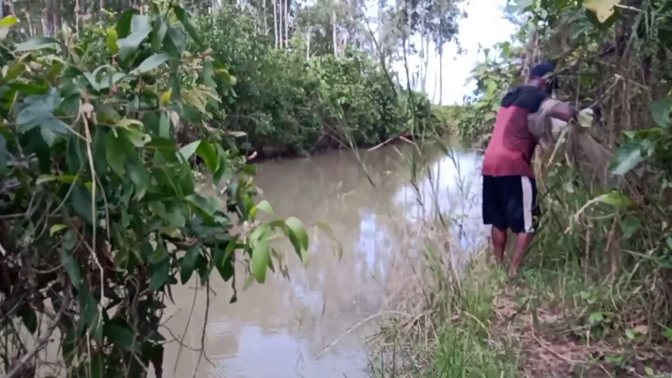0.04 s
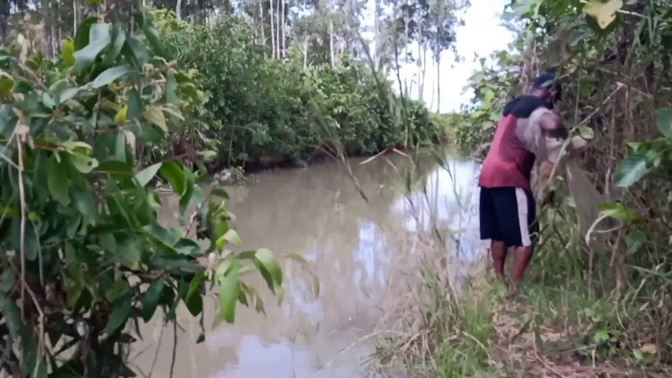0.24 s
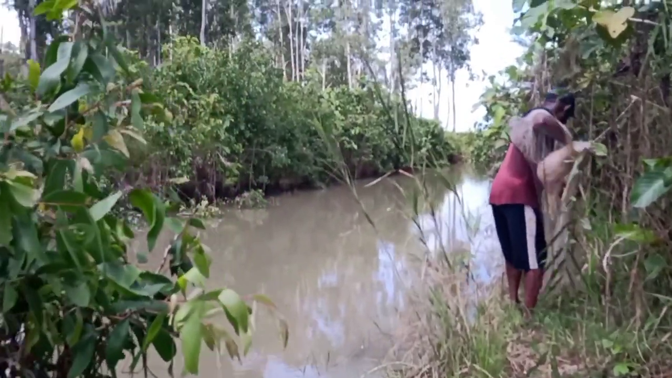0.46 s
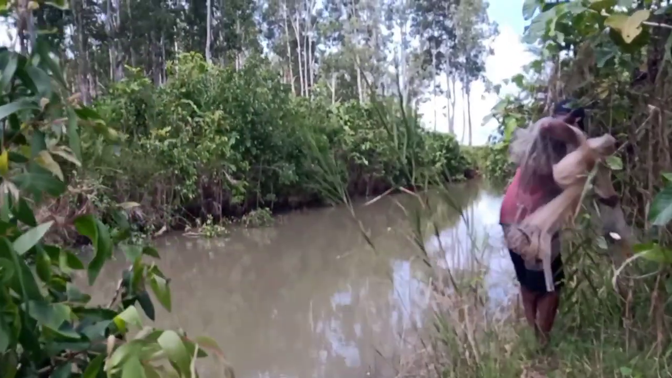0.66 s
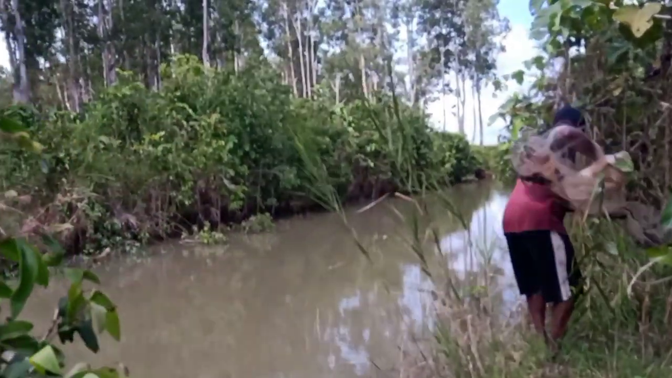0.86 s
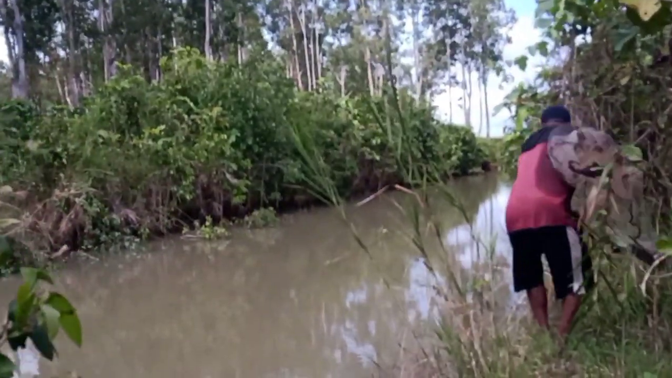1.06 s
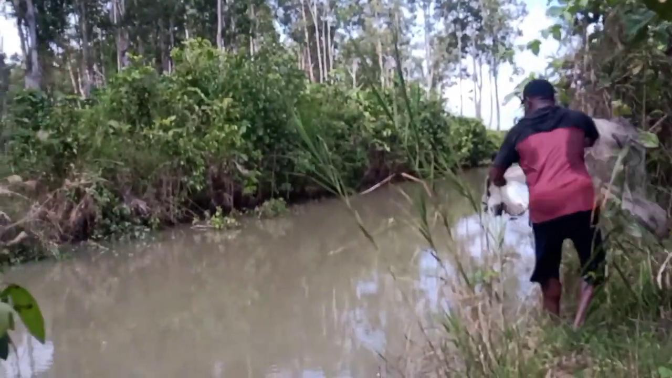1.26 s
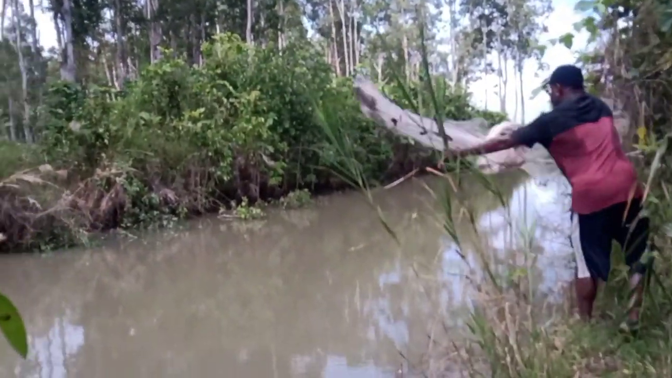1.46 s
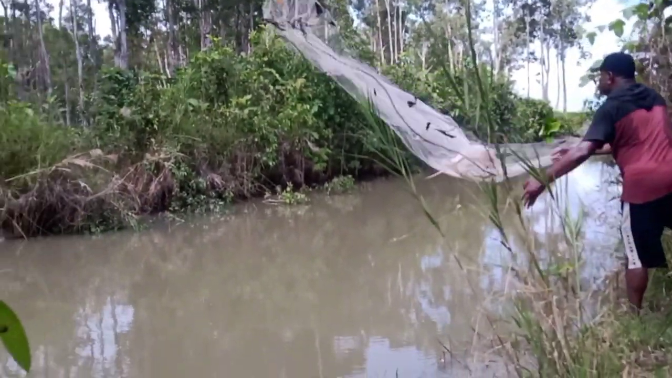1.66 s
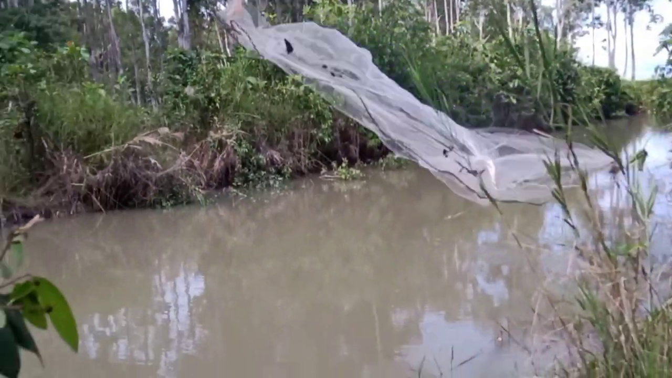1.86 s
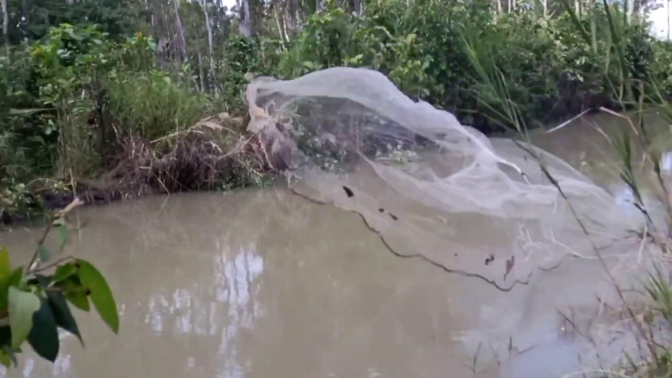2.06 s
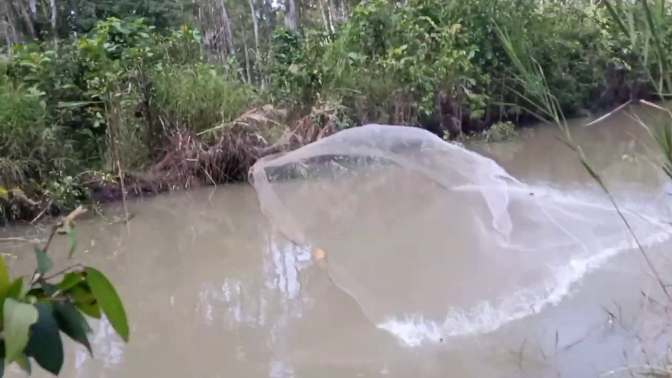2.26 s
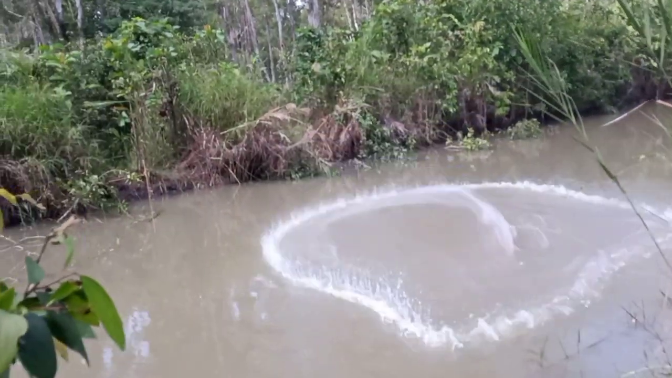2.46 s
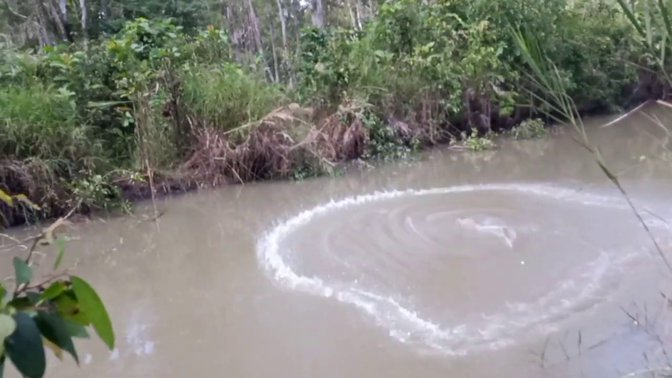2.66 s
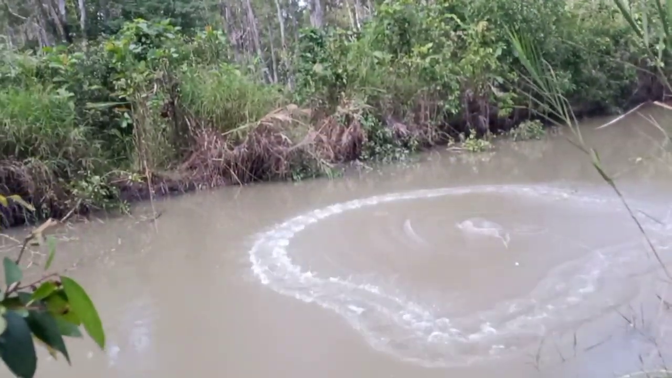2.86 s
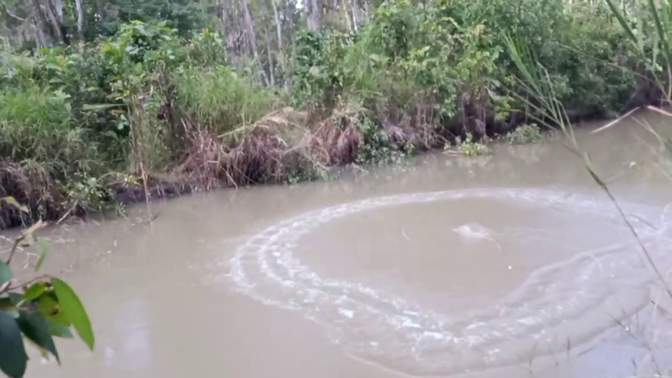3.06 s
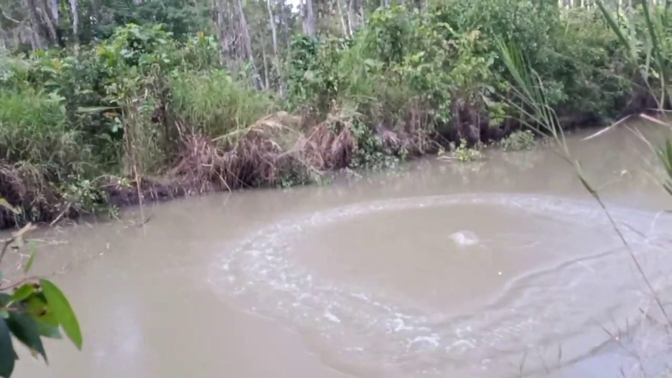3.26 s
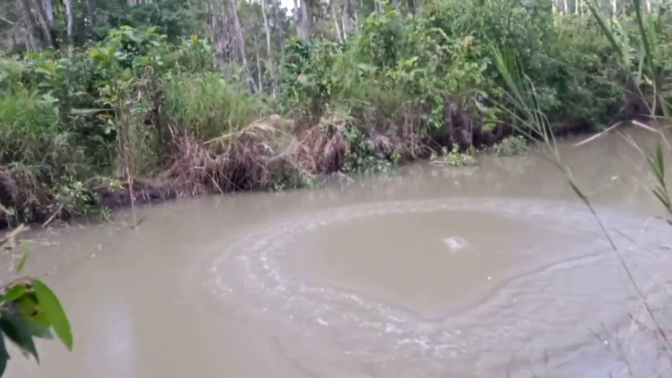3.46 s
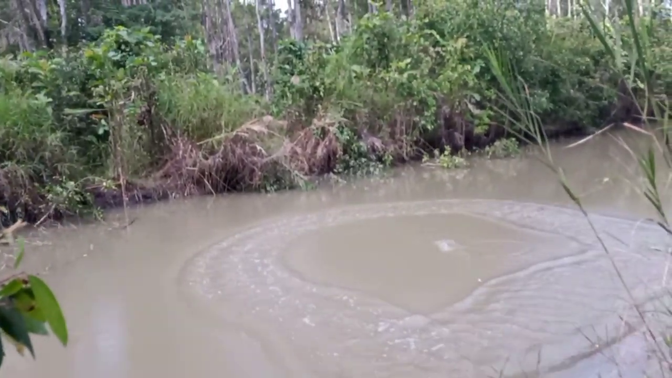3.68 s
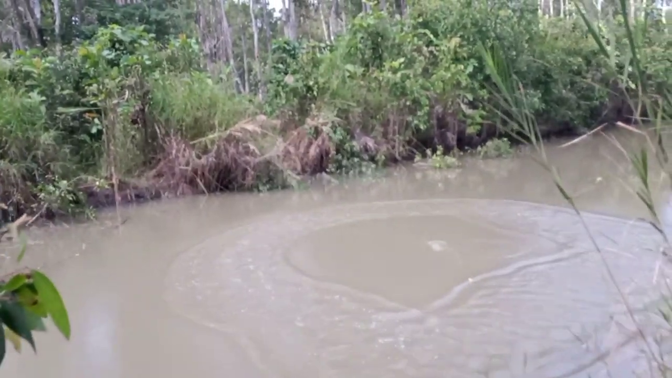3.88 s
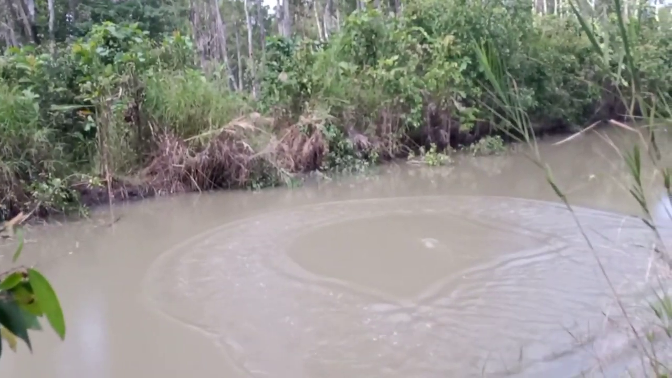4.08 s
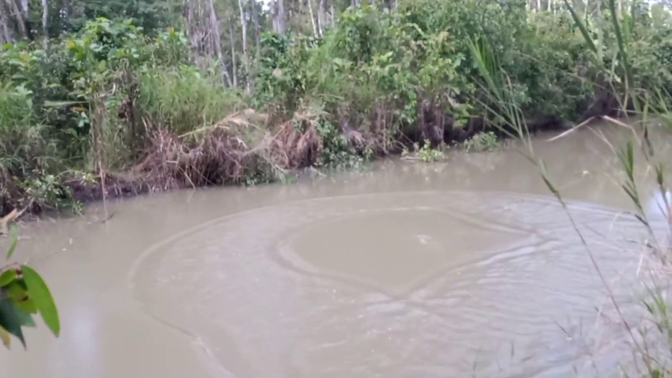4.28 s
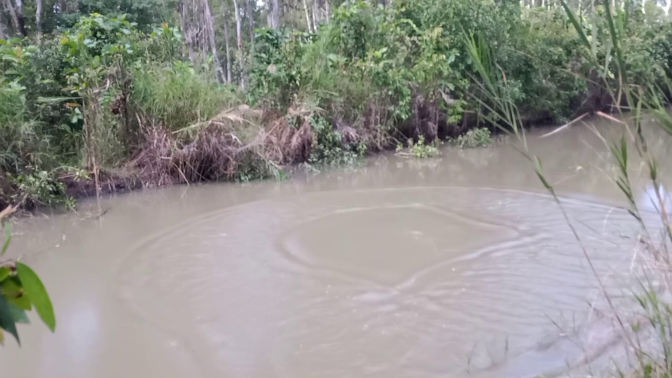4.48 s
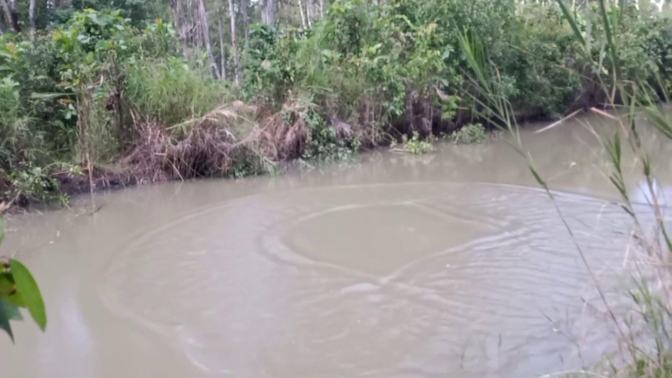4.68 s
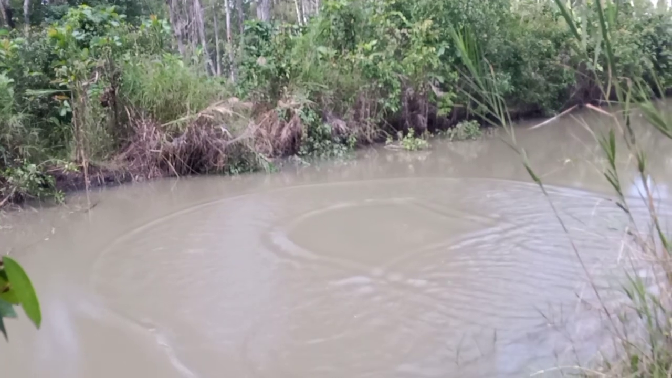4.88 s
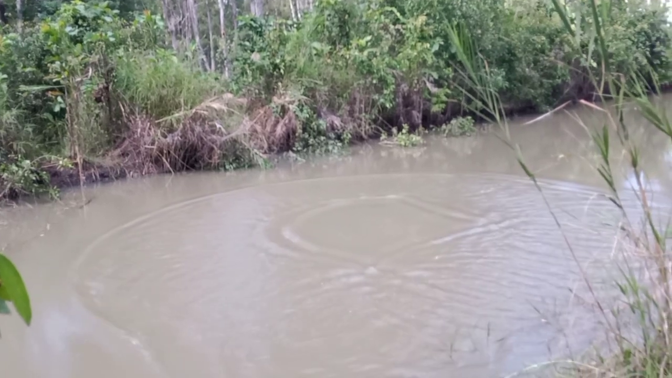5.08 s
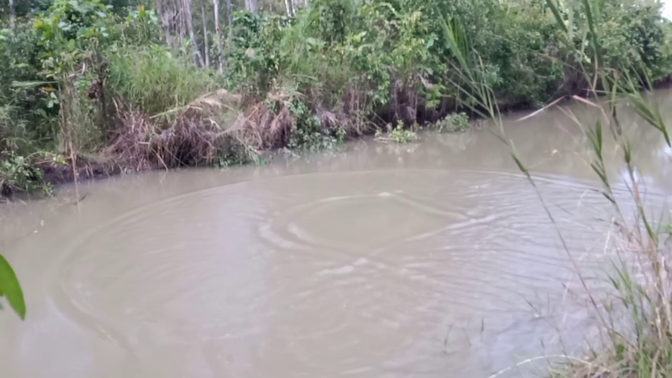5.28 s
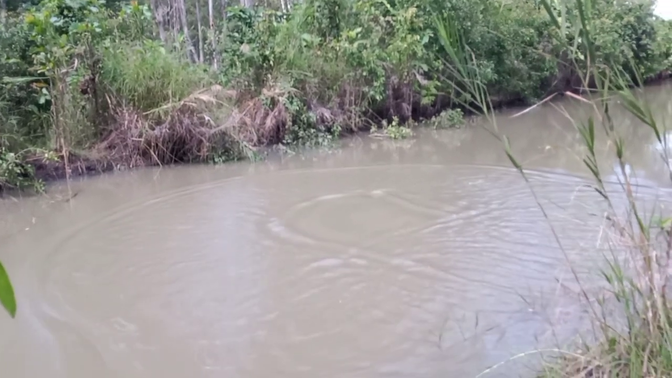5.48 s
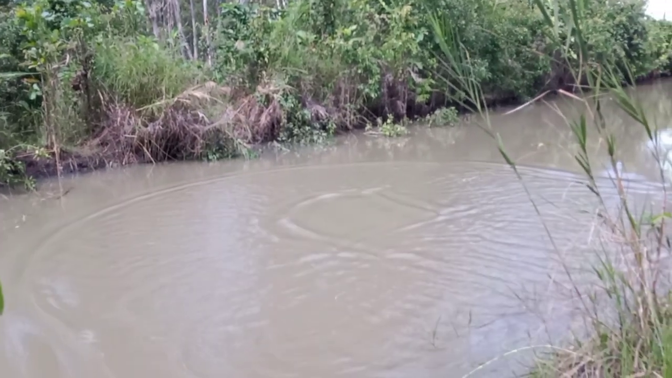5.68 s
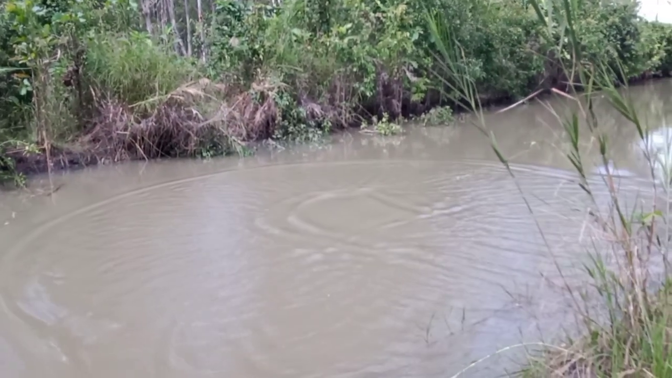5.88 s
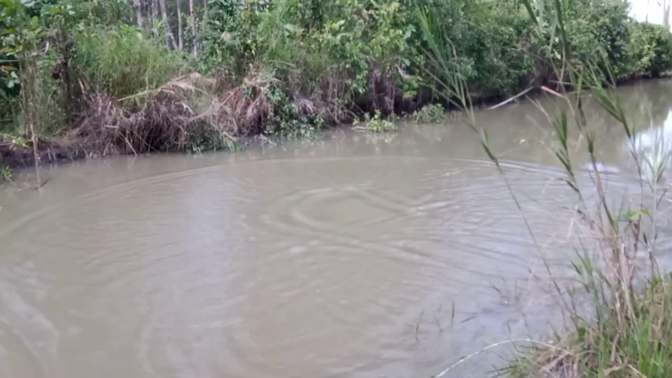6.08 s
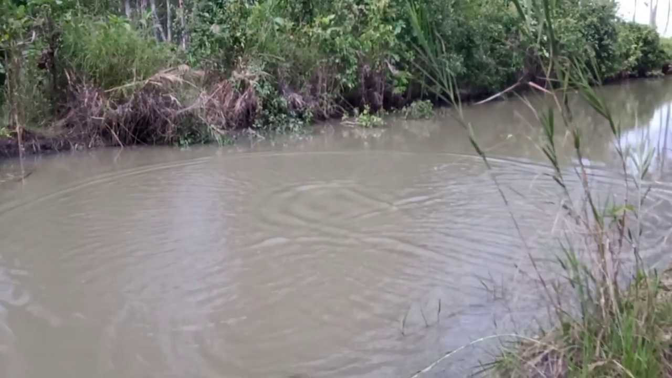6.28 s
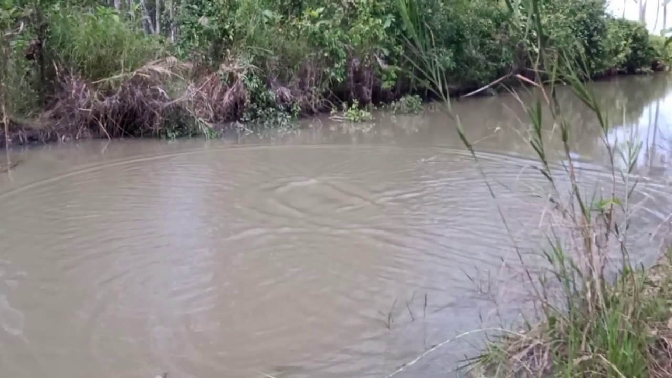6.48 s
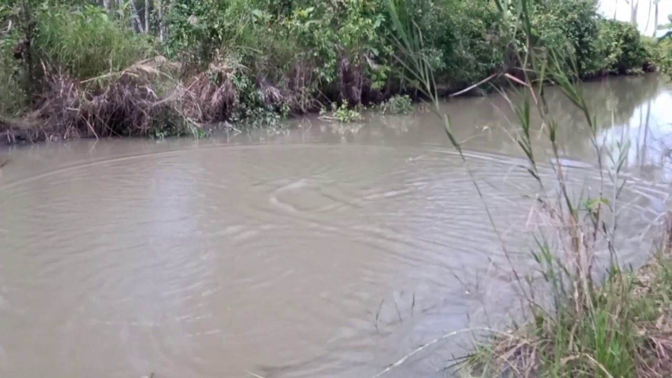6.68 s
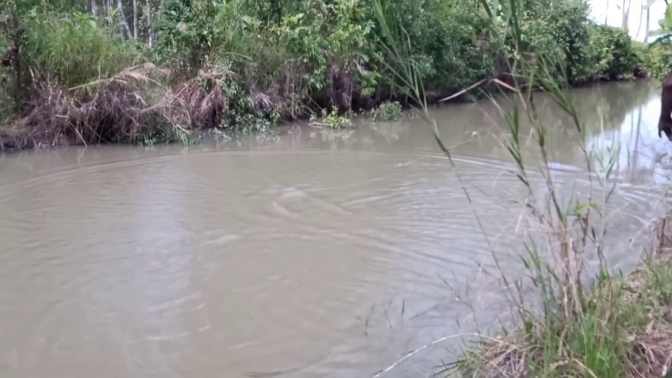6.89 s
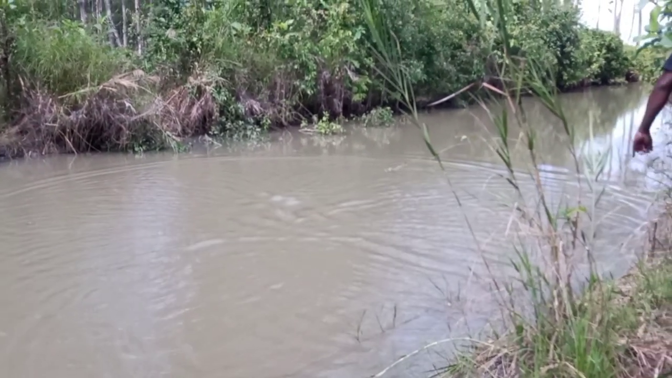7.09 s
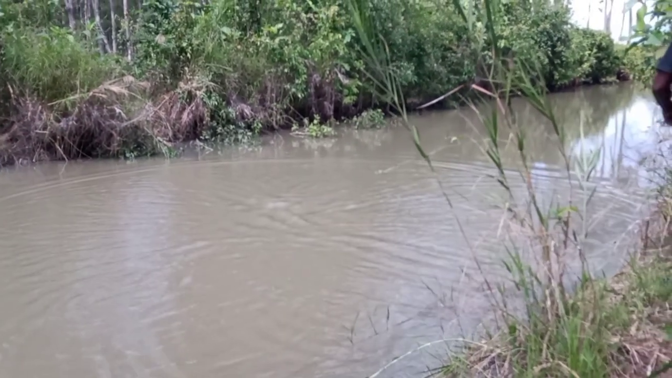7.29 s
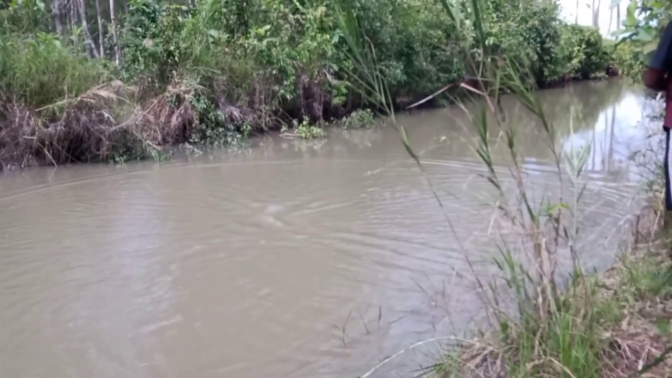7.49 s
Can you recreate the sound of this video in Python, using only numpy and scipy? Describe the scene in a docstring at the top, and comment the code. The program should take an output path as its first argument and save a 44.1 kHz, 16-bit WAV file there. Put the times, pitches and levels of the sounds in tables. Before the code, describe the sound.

On a quiet river bank, a thrown net whooshes and lands in a fizzing splash, after crackling grass, with steady high insect trills continuing throughout.

```python
"""On a grassy river bank a fisherman gathers a cast net, steps forward and throws it.
Grass and mesh rustle as crackling noise, stalks snap, and weights on the rim patter in amid ringing bubbles.
A near bush cricket trills in short falling tones over a steady band of insect noise; a fainter cricket chirps.
Birds whistle in gliding tones, an engine throbs far away in low puffs, and wind and hiss are soft noise.
The bank is open, with little echo; both channels are alike."""
import sys
import numpy as np
from scipy import signal
from scipy.fft import rfft, irfft, next_fast_len
from scipy.io import wavfile
from scipy.ndimage import map_coordinates

SR = 44100
rng = np.random.default_rng(int(sys.argv[2]) if len(sys.argv) > 2 else 0)


def store_pcm(level_fs):
    """Save levels as 16-bit WAV."""
    pcm = np.round(np.clip(level_fs, -1, 1) * 32767).astype(np.int16)
    wavfile.write(sys.argv[1], SR, np.atleast_2d(pcm).T)


N = 332514

# trills of the near bush cricket: (first stroke [s], last stroke [s], level before small lifts [dB])
TRILLS = [(0.233, 0.568, -46), (1.081, 1.41, -41), (2.385, 2.713, -42), (3.001, 3.272, -39),
          (3.583, 3.893, -39.5), (4.202, 4.494, -39.5), (4.801, 5.094, -39.5), (5.4, 5.71, -40),
          (6.06, 6.393, -38.5), (6.844, 7.117, -39)]
# tone colour of crisp blades and fine spray: (frequency [Hz], level [dB])
CRISP = [(2500, 6.5), (4500, -7.5), (7000, 1), (10000, 2), (11400, 1), (12400, 0), (13700, -0.5),
         (14600, 6), (15800, -9)]
LANDING = 2.169  # the first weights touch the water (s)


def amp(db):
    """Decibels to gain."""
    return 10 ** (np.asarray(db) / 20)


def unit(x):
    """Scale to rms 1."""
    return x / np.sqrt(np.mean(x ** 2) + 1e-20)


def clock():
    """The time of every sample, in seconds."""
    return np.arange(N) / SR


def wobble(rate):
    """A smooth random curve through rate random points a second."""
    knots = rng.standard_normal(int(N * rate / SR) + 4)
    return map_coordinates(knots, [clock() * rate])


def colour(x, points):
    """Shape x by (Hz, dB) points joined on a log frequency axis."""
    size = next_fast_len(len(x) + 8192)
    f, db = np.transpose(points)
    hz = np.fft.rfftfreq(size, 1 / SR)
    curve_db = np.interp(np.log(hz + 1), np.log(np.sort(f)), db, left=-120, right=-120)
    return irfft(rfft(x, size) * amp(curve_db), size)[:len(x)]


def noise(points):
    """Coloured noise of rms 1."""
    return unit(colour(rng.standard_normal(N), points))


def add(track, s, sound):
    """Mix a sound into the track at time s."""
    start = max(round(s * SR), 0)
    part = track[start:start + len(sound)]
    part += sound[:len(part)]


def swell(start, length, attack_s, release_s):
    """A gain that rises, holds until its length is over, then dies away."""
    t = clock() - start
    rise = np.clip(t / attack_s, 0, 1)
    return rise * np.exp(-np.clip((t - length) / release_s, 0, 30))


def bump(s, half_width):
    """A brief bell-shaped rise to 1 around time s."""
    return np.exp(-np.minimum(((clock() - s) / half_width) ** 2, 30))


def crackle(points, rate, spread_db, smooth):
    """Tiny random impacts of uneven size, rate a second, over a smooth wash, rms 1."""
    count = int(rate * N / SR)
    sizes = amp(spread_db * np.minimum(rng.exponential(size=count), 3.2))
    sizes = sizes * rng.choice([-1, 1], count)
    ticks = np.bincount(rng.integers(N, size=count), sizes, N)
    return unit(unit(colour(ticks, points)) + smooth * noise(points))


def rustle():
    """Blades and mesh rub with a dull scrape and a crisp hiss; the flying net swishes."""
    # netting or legs dragged through grass, levels before clumping and the crisp lift:
    # (start [s], length [s], rubbing level [dB], crisp hiss level [dB])
    moves = [(-.02, 1.47, -64, -70.5), (-.02, 0.24, -63.5, -80), (0.32, 0.47, -59, -64.5),
             (0.386, .13, -51, -57), (0.69, 0.081, -63, -62), (1.017, .05, -57, -67),
             (1.168, 0.53, -59, -59.5), (1.232, .21, -56, -55), (1.628, 0.033, -49.5, -57),
             (1.727, .28, -54.5, -54), (1.78, 0.054, -46.5, -63), (1.927, 0.062, -50, -50),
             (2.055, 0.19, -57, -67), (2.996, 1.15, -73, -73), (3.438, 0.31, -64, -74),
             (3.726, 0.31, -77, -78), (4.763, 0.11, -71, -83), (5.123, 0.29, -72, -94),
             (6.17, 0.42, -68, -83), (6.87, .15, -70.5, -79), (7.395, 0.085, -65.5, -82)]
    # folds of the net whipping open, before a 0.5 dB cut: (time [s], half width [s], level [dB])
    swishes = [(1.826, 0.036, -42.5), (1.92, 0.025, -40.5)]
    # tone colour of rubbing grass: (frequency [Hz], level [dB])
    rub_colour = [(59, -32), (100, -14), (142, -6), (261, -6.5), (426, -1), (508, -2.5), (594, -0.5),
                  (903, 1), (1220, -3.5), (1690, -0.5), (2240, -0.5), (4430, -14), (6500, -23.5),
                  (8450, -45), (14300, -120)]
    # tone colour of mesh flying open: (frequency [Hz], level [dB])
    swish_colour = [(600, -8.5), (1200, -7), (1600, -4), (1900, 0.5), (2400, -3), (3100, -9), (4200, -15.5),
                    (6500, -26), (10000, -53)]
    attack_s, release_s = 0.018, 0.038  # the blades bend, then spring back
    power = 0
    for s, length, rub_db, hiss_db in moves:
        power = power + np.outer(amp([rub_db, hiss_db]), swell(s, length, attack_s, release_s)) ** 2
    rub, crisp = np.sqrt(power)
    flight = sum(amp(db) * bump(s, half_width) for s, half_width, db in swishes)
    clumps = unit(amp(2.4 * wobble(70)))
    blades = crackle(CRISP, rate=2000, spread_db=4, smooth=.9)
    scrape = rub * crackle(rub_colour, rate=800, spread_db=4.0, smooth=0.87)
    swish = amp(-0.5) * flight * crackle(swish_colour, rate=1300, spread_db=0.5, smooth=0.73)
    return swish + clumps * (scrape + amp(2.5) * crisp * blades)


def bank(x, t60=0.36):
    """The bushes on the far bank scatter back a short tail that falls 60 dB in t60 seconds."""
    t = np.arange(SR // 2) / SR
    tail = rng.standard_normal(len(t)) * amp(-60 * t / t60) * (t > .008)
    return signal.fftconvolve(x, tail / np.linalg.norm(tail))[:N]


def chorus(scatter_db=-13.0, build_s=0.16, fade_s=0.065):
    """Many distant insects blur into one fluttering band; leaves scatter the near trills into it."""
    # tone colour of the massed insects: (frequency [Hz], level [dB])
    band = [(6000, -58), (6800, -37), (7300, -16.5), (7750, -6), (8100, 3.5), (8450, -1), (8900, -11),
            (9200, -25), (9900, -60), (12000, -39)]
    # bush crickets farther off joining in: (start [s], length [s], level [dB])
    far_trills = [(.04, 0.48, -49), (.82, 1.17, -51), (2.1, 0.39, -46.5), (3.75, 0.29, -51),
                  (4.45, 0.47, -53.5), (6.25, .28, -53)]
    start_db, recede_db_per_s = -48.5, 0.3
    bed = amp(start_db - recede_db_per_s * clock())
    scattered = [(first, last - first, db + scatter_db) for first, last, db in TRILLS]
    power = bed ** 2
    for s, length, db in list(far_trills) + scattered:
        power = power + (amp(db) * swell(s, length, build_s, fade_s)) ** 2
    flutter_hz = 52 + 6 * wobble(5.6)  # close to the wing stroke rate
    flutter = np.sin(2 * np.pi * np.cumsum(flutter_hz) / SR)
    return np.sqrt(power) * unit(noise(band) * amp(0.68 * flutter))


def small_cricket(pitch_hz=9430, chirp_rate=9, level_db=-71.5, early_db=-6):
    """Faint high chirps of narrow noise with short rests, growing clearer from 3 to 3.7 s."""
    turn = 2 * np.pi * np.cumsum(chirp_rate + 0.426 * wobble(2.7)) / SR
    gate = np.clip(.9 + np.sin(turn), 0, 1)
    gate = gate * (1 + .3 * np.sin(5 * turn))  # quicker pulses within the chirp
    clearer_db = np.interp(clock(), [3, 3.7], [early_db, 0])
    tone = noise([(pitch_hz - 450, -30), (pitch_hz, 0), (pitch_hz + 450, -30)])
    return amp(level_db + clearer_db) * unit(gate * tone)


def air():
    """Light wind in far trees as gently swaying noise, and a thin even hiss."""
    # tone colour of the wind: (frequency [Hz], level [dB])
    wind_colour = [(15, -37), (25, -29), (81, 1), (152, -3.5), (440, -1.5), (494, -3), (882, -6),
                   (1400, -10.5), (1940, -9), (2680, -9.5), (3220, -13.5), (4450, -23.5), (6300, -27.5),
                   (8190, -47), (13900, -120)]
    # tone colour of the hiss: (frequency [Hz], level [dB])
    hiss_colour = [(4000, -35), (6000, -15), (10500, 1), (12500, -5), (13700, 1), (14700, -2), (15600, 10)]
    sway = amp(.6 * wobble(2))
    return amp(-66.0) * noise(wind_colour) * sway + amp(-79) * noise(hiss_colour)


def far_engine(beat_rate=7.2, pipe_hz=86, level_db=-66):
    """A slow single cylinder, so far off that only soft low puffs arrive, slightly uneven."""
    out, t = np.zeros(N), np.arange(-SR // 20, SR // 20) / SR
    for s in np.arange(.105, N / SR, 1 / beat_rate):
        puff = np.exp(-(t / 0.012) ** 2) * np.cos(2 * np.pi * pipe_hz * t)
        add(out, s + t[0] + rng.normal(0, 0.0061), amp(level_db + rng.normal(0, 2)) * puff)
    return out


def snap(points, t60):
    """A coloured crack of peak 1 that begins 5 ms in, from noise falling 60 dB in t60 seconds."""
    t = np.arange(SR // 20) / SR
    burst = rng.standard_normal(len(t)) * amp(-60 * t / t60)
    burst = colour(np.pad(burst, (SR // 200, 0)), points)
    return burst / np.abs(burst).max()


def steps(crack_t60=0.035, click_t60=0.0044, brighten=0.6):
    """Stalks crack, lead weights click, and the soft ground thuds under a foot."""
    # stalks cracking underfoot: (time [s], peak level [dB], top against body [dB])
    cracks = [(.226, -46.5, 1), (0.356, -35.5, -11.5), (0.458, -35.5, -13), (0.494, -40, -6),
              (0.52, -36.5, -6.5), (.602, -42, -7), (1.019, -37.5, -10.5), (1.036, -32.5, -12),
              (1.046, -45, -6), (1.06, -34.5, -16.5), (1.086, -42, -18), (1.222, -42, -13),
              (1.378, -36, -10), (1.587, -40, -10.5), (1.67, -43, -3), (1.734, -41.5, -12),
              (4.859, -49, -9), (5.812, -46.5, -6.5), (7.003, -43, -6.5), (7.308, -51.5, -21),
              (7.463, -38, -16), (7.476, -42, -18), (7.509, -41.5, -10)]
    # tone colour of a stalk before its tilt: (frequency [Hz], level [dB])
    stalk = [(59, -38), (100, -15), (449, 3.5), (828, 1.5), (1260, -2), (2760, -2.5), (4430, -40),
             (4920, -27), (6500, -27), (8450, -58), (14300, -120)]
    # lead weights clicking together: (time [s], peak level [dB])
    clicks = [(.709, -40), (1.284, -31), (1.409, -30), (1.467, -35), (1.4704, -20.5), (1.4943, -30.5),
              (6.453, -52)]
    # soft footfalls: (time [s], peak level [dB], frequency [Hz])
    thuds = [(1.335, -49, 77.5), (2.02, -57, 58)]
    lead_colour = [(600, -24), (3000, -14), (6000, -12.5), (8500, -4), (11500, -17), (15500, -10)]  # (Hz, dB)
    out, lead_in_s = np.zeros(N), 1 / 200  # the silent start of a snap
    for s, db, top_db in cracks:
        tilt = brighten * (top_db + 9.5)  # dB per octave: dry stalks snap brighter
        tilted = [(hz, level + tilt * np.log2(hz / 1000)) for hz, level in stalk]
        add(out, s - lead_in_s, amp(db) * snap(tilted, crack_t60))
    for s, db in clicks:
        add(out, s - lead_in_s, amp(db) * snap(lead_colour, click_t60))
    t = np.arange(-SR // 40, SR // 40) / SR
    for s, db, hz in thuds:
        add(out, s + t[0], amp(db) * np.hanning(len(t)) * np.sin(2 * np.pi * hz * t))
    return out


def bush_cricket(stroke_rate=48, pitch_hz=8160, start_drop_hz=420, end_drop_hz=1100, width_s=0.0033, flick_db=-13):
    """Each wing stroke is a short tone that sags as the wing slows; a trill warms up in pitch and strength."""
    swell_db = 1  # a trill gains this much from first stroke to last, besides warming up
    out = np.zeros(N)
    t = np.arange(-SR // 100, SR // 80) / SR
    sag = np.clip((t - .0015) / 0.0067, 0, None) ** 1.42
    for first, last, db in TRILLS:
        strokes = np.linspace(first, last, round((last - first) * stroke_rate) + 1)
        for k, s in enumerate(strokes):
            cold = max(1 - k / 5.36, 0)  # gone after the first few strokes
            sharp, strong, late = rng.standard_normal(3)
            hz = pitch_hz + 22 * sharp - start_drop_hz * cold * (1 - np.minimum(sag, 1))
            hz = hz - end_drop_hz * np.minimum(sag, 1.15)
            body = amp(-7 * cold + 1.4 * strong) * np.exp(-np.abs(t / width_s) ** 1.9 / 2)
            flick = amp(flick_db) * np.exp(-((t - .0055) / 0.002) ** 2)
            level = amp(db + 1.5 + swell_db * ((s - first) / (last - first) - .5))
            tone = np.sin(2 * np.pi * np.cumsum(hz) / SR)
            add(out, s + t[0] + .0003 * late, level * (body + flick) * tone)
    return out


def bubble(hz, cycles, rise):
    """A pocket of air rings, 30 dB down after some cycles, rising in pitch as it nears the surface."""
    t = np.arange(SR // 20) / SR
    age = t * hz / cycles
    tone = np.sin(2 * np.pi * hz * t * (1 + rise * np.minimum(age, 2) / 2))
    return tone * amp(-30 * age) * (1 - np.exp(-t * hz * 2))


def fizz(points, low_hz, high_hz, count, cycles, rise=.12, spread_db=13):
    """A cloud of random bubbles as the water churns, brought to rms 1 over the second after landing."""
    churn_s = 1.23  # new bubbles keep ringing this long after the landing
    cloud = np.zeros(N)
    for when, pitch, size in rng.random((count, 3)):
        hz = low_hz * (high_hz / low_hz) ** pitch
        s = LANDING + when * churn_s
        add(cloud, s, amp(spread_db * size) * np.sqrt(hz) * bubble(hz, cycles, rise))
    cloud = colour(cloud, points)
    return cloud / cloud[round(LANDING * SR):][:SR].std()


def landing(rim_db, mesh_db, release_s, lag_s, attack_s):
    """Loud while the rim falls, softer while the mesh follows it in, then the water calms."""
    rim_down, mesh_down = 2.59, 2.883  # the last weights are in, then the last of the mesh (s)
    settle_s = 0.018  # the rim's noise dies this fast
    start = LANDING + lag_s
    rim = amp(rim_db) * swell(start, rim_down - start, attack_s, settle_s)
    mesh = amp(mesh_db) * swell(start, mesh_down - start, attack_s, release_s)
    return np.hypot(rim, mesh)


def splash():
    """The rim weights patter in, throw fine spray and drag down air that rings as bubbles."""
    # bunches of weights, and last the folds of mesh, striking together:
    # (time [s], half width [s], extra churning [dB], extra spray [dB])
    bunches = [(2.179, 0.0093, 3, 8), (2.246, 0.0084, 8, 3), (2.512, .018, 1, 8), (2.579, 0.022, 5, -1),
               (2.895, 0.027, 3.5, 5), (3.035, 0.019, 4, 1)]
    # larger pockets of air closing: (time [s], level before a 2.5 dB cut [dB], frequency [Hz])
    plop_list = [(2.235, -26.5, 690), (2.244, -25, 681), (2.304, -37.5, 392), (2.334, -27, 890),
                 (2.414, -39.5, 323), (2.447, -22.5, 737), (2.477, -29, 850), (2.499, -28, 778),
                 (2.573, -25, 727), (2.583, -25, 823), (2.635, -34, 847), (2.724, -33, 965),
                 (2.815, -29.5, 818), (2.899, -34.5, 730), (3.006, -35, 975), (3.039, -39.5, 632),
                 (3.629, -48, 668), (3.684, -49, 734)]
    # tone colour of deep pockets of air: (frequency [Hz], level [dB])
    gulp_colour = [(110, -16), (190, -15), (260, -12), (315, -1), (400, -2), (490, -8.5), (700, -19)]
    # tone colour of bubbles: (frequency [Hz], level [dB])
    bubble_colour = [(300, -31), (490, -11), (620, -3), (730, 1.5), (900, 3.5), (1100, -5), (1500, -30),
                     (3000, -47)]
    # tone colour of pattering weights: (frequency [Hz], level [dB])
    patter_colour = [(400, -16), (900, -8.5), (1300, -2), (1600, -2), (1950, 0.5), (2300, -2.5), (2800, -3),
                     (3500, -10.5), (4700, -16.5), (7000, -18.5), (12000, -29)]
    air_lag_s = 0.049  # the weights sink this long before air closes behind them
    first_spray_db, first_spray_s = 4.5, 0.12  # the first, fastest weights throw the most spray
    churn = amp(sum(db * bump(s, half_width) for s, half_width, db, _ in bunches))
    burst = amp(sum(db * bump(s, half_width) for s, half_width, _, db in bunches))
    # the square root halves the extra dB for the deep sound
    plunge = np.sqrt(churn) * landing(rim_db=-50.0, mesh_db=-60.5, release_s=0.25, lag_s=air_lag_s, attack_s=0.021)
    froth = churn * landing(rim_db=-41, mesh_db=-45.5, release_s=0.15, lag_s=air_lag_s, attack_s=0.013)
    patter = churn * landing(rim_db=-42.0, mesh_db=-45.0, release_s=0.15, lag_s=0, attack_s=0.0024)
    spray = burst * landing(rim_db=-53.5, mesh_db=-60.5, release_s=0.19, lag_s=0, attack_s=.002)
    spray *= amp(first_spray_db * np.exp(-np.abs(clock() - LANDING) / first_spray_s))
    plops = np.zeros(N)
    for s, db, hz in plop_list:
        add(plops, s, amp(db - 2.5) * bubble(hz, cycles=25, rise=0.082))
    gulps = fizz(gulp_colour, 199, 526, count=450, cycles=6.5) + 0.33 * noise(gulp_colour)
    deep = amp(-.5) * plunge * gulps
    bubbles = fizz(bubble_colour, 480, 1487, count=700, cycles=12.5) + 0.35 * noise(bubble_colour)
    water = amp(-2.0) * froth * bubbles
    taps = crackle(patter_colour, rate=1100, spread_db=2.5, smooth=0.65)
    taps = taps + 0.62 * fizz(patter_colour, 895, 4460, count=1200, cycles=6)
    drops = amp(-1.5) * patter * taps
    mist = amp(2.0) * spray * crackle(CRISP, rate=1700, spread_db=4.0, smooth=0.83)
    unevenness = unit(amp(1.06 * wobble(80)))
    return deep + water + plops + (drops + mist) * unevenness


def birds():
    """Thin whistles and quick glides, their level shaken by the trees between."""
    # far calls, level before the shaking and a 3.5 dB cut:
    # (time [s], length [s], start frequency [Hz], end frequency [Hz], level [dB], pitch waver [share])
    calls = [(4.025, 0.039, 3900, 4230, -70, .015), (4.18, .03, 4500, 4900, -73, .015),
             (4.198, .04, 3380, 4300, -66, .02), (4.257, 0.089, 4070, 3450, -73, .025),
             (4.99, 0.092, 4330, 4470, -70, .003), (5.05, .3, 4400, 4390, -76, .003),
             (5.02, 0.3, 5480, 5500, -80, .003), (4.99, 0.055, 3210, 3290, -62, 0.015),
             (5.08, 0.3, 3310, 3130, -65.5, 0.035), (5.43, 0.16, 3070, 3190, -64.5, 0.026),
             (6.08, 0.028, 5300, 4750, -71, .025)]
    syllable_rate, syllable_dip_db = 13, 5  # long calls break into syllables: per second, dip between
    out, waver = np.zeros(N), wobble(160)
    for s, length, start_hz, end_hz, db, share in calls:
        hz = np.linspace(start_hz, end_hz, max(round(length * SR), 2))
        hz *= 1 + share * waver[round(s * SR):][:len(hz)]
        count = max(round(length * syllable_rate), 1)
        syllables = np.sin(np.linspace(0, np.pi * count, len(hz))) ** 2
        level = amp(db - syllable_dip_db * (1 - syllables)) * np.sqrt(np.hanning(len(hz)))
        add(out, s, level * np.sin(2 * np.pi * np.cumsum(hz) / SR))
    out *= amp(-3.5 + 2.5 * wobble(45))
    return out + amp(-7) * bank(out, t60=.2)


def scene():
    """All sources, the same in both channels; the near ones also echo weakly from the far bank."""
    near = bush_cricket() + steps() + splash() + rustle()
    far = chorus() + small_cricket() + birds() + far_engine() + air()
    mono = near + amp(-12) * bank(near) + far
    return np.array([mono, mono])


def record(dry):
    """Remove everything from the band limit upward."""
    top_hz = 15780
    size = next_fast_len(N + 8192)
    keep = np.fft.rfftfreq(size, 1 / SR) < top_hz
    return irfft(rfft(dry, size) * keep, size)[:, :N]


dry = scene()
out = record(dry)
store_pcm(out)
```